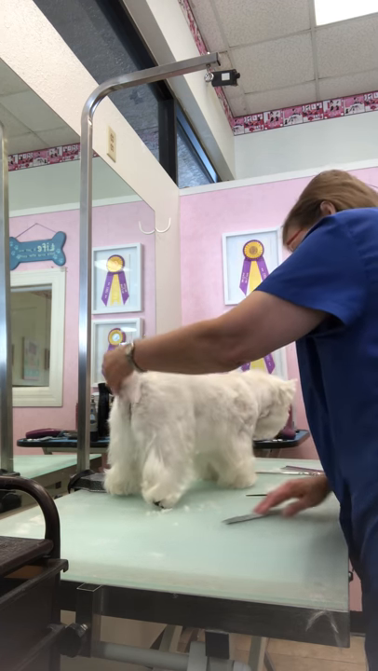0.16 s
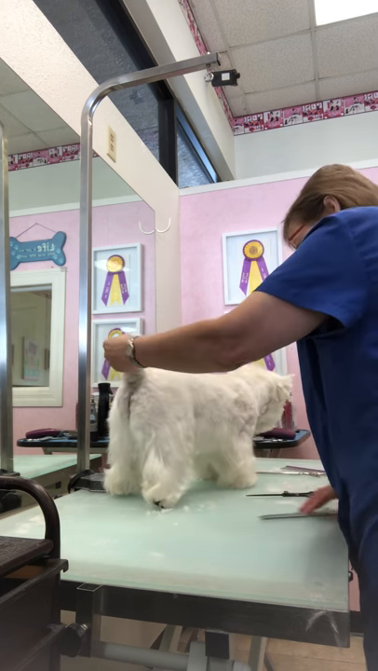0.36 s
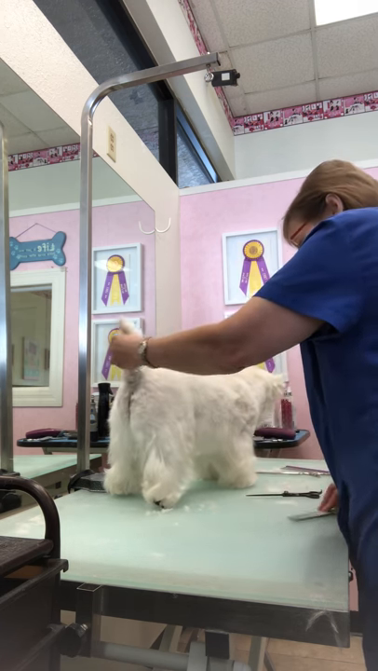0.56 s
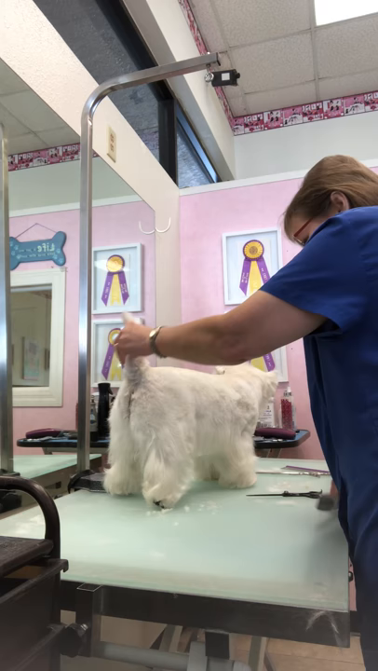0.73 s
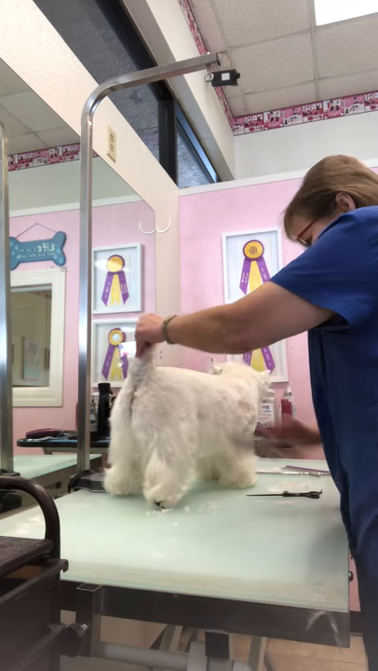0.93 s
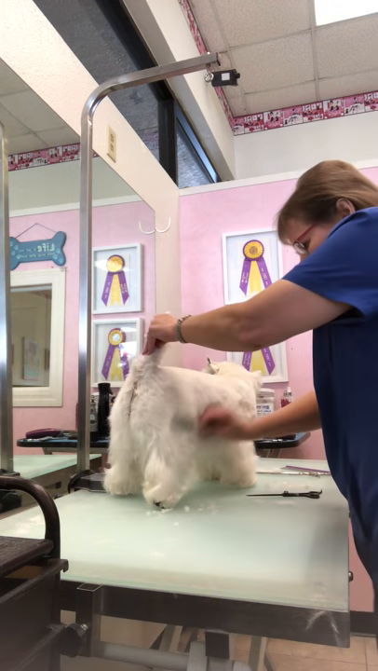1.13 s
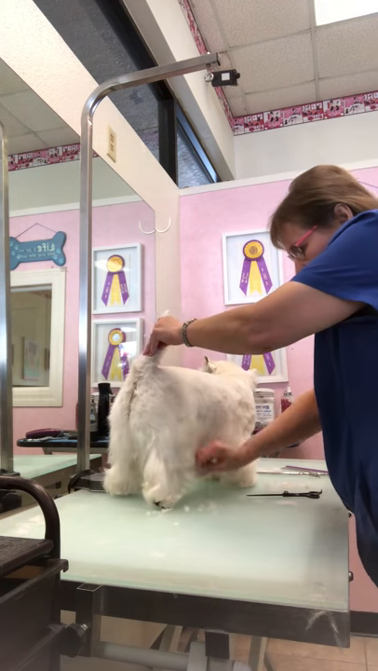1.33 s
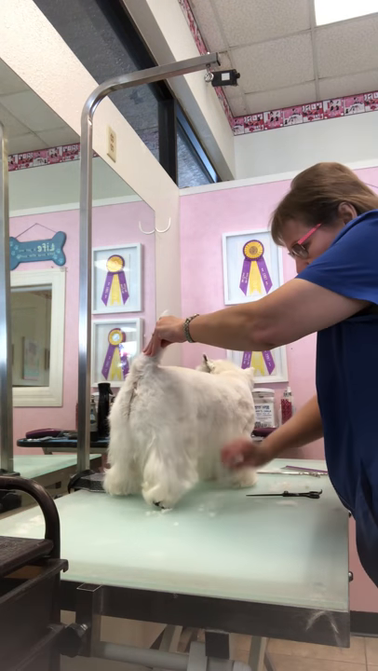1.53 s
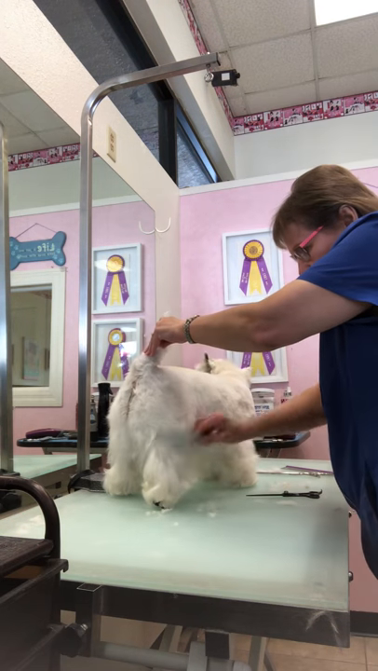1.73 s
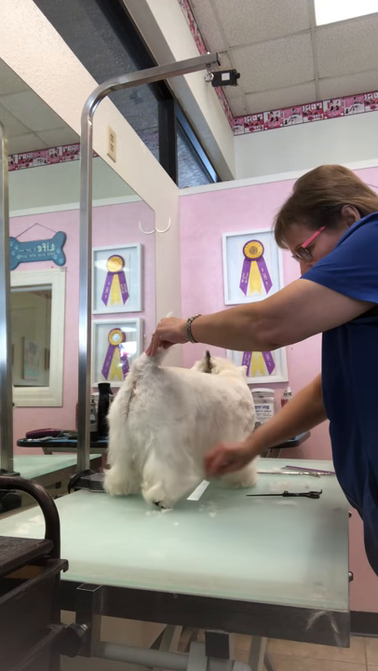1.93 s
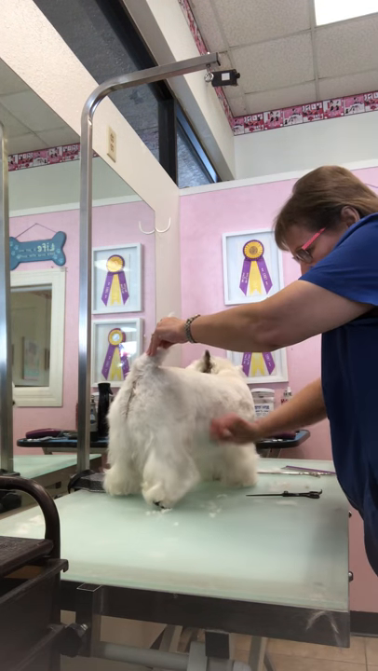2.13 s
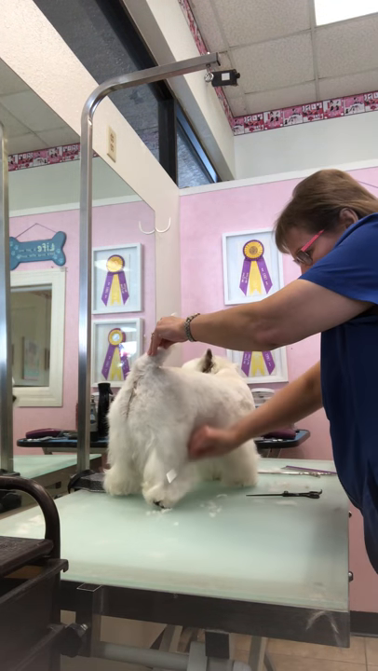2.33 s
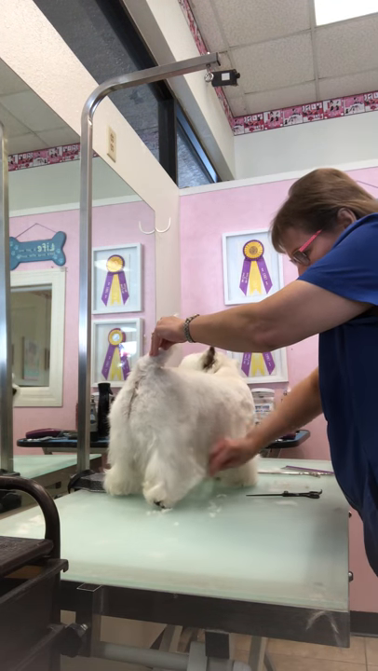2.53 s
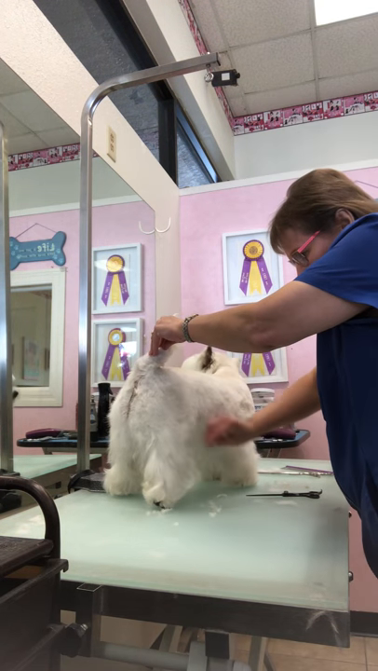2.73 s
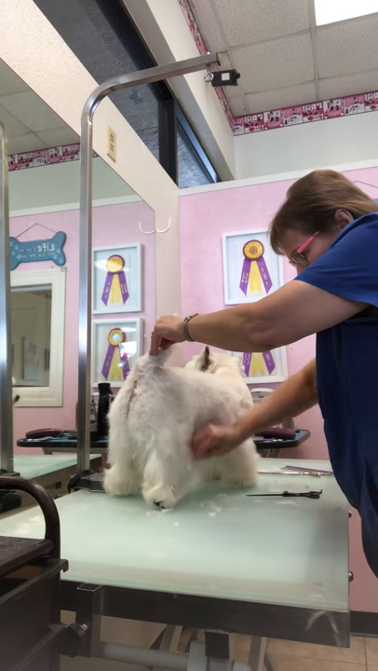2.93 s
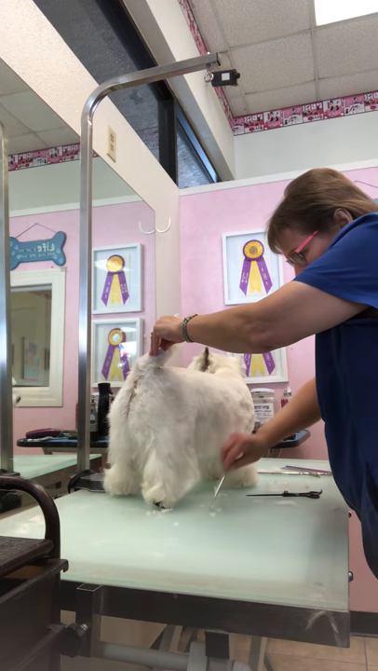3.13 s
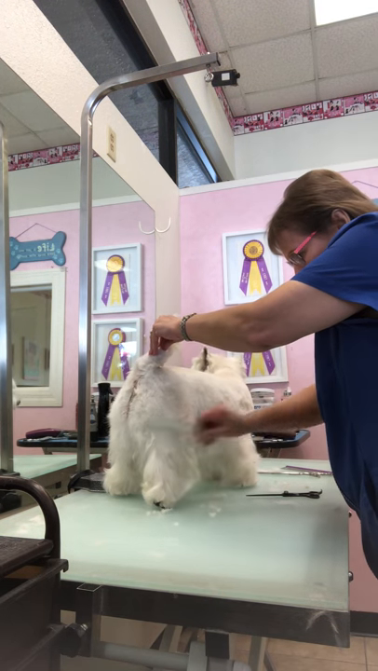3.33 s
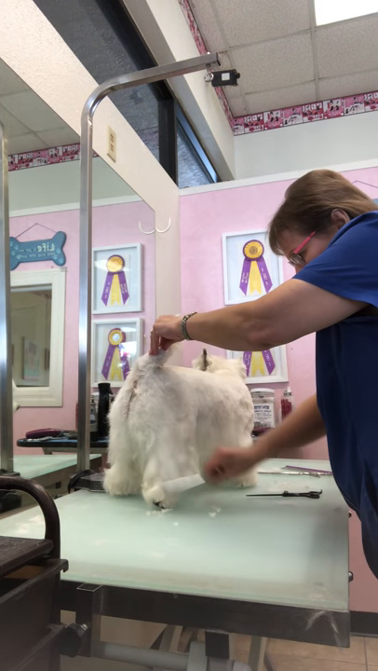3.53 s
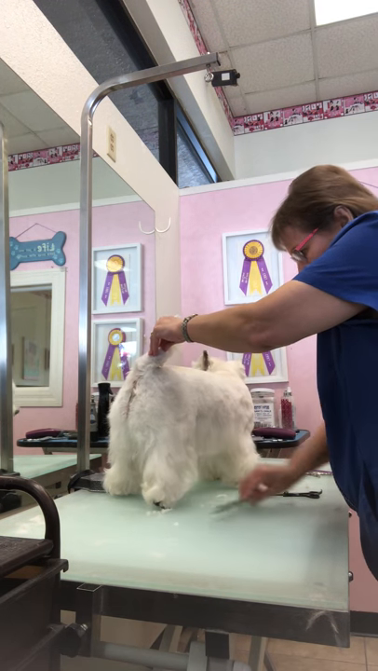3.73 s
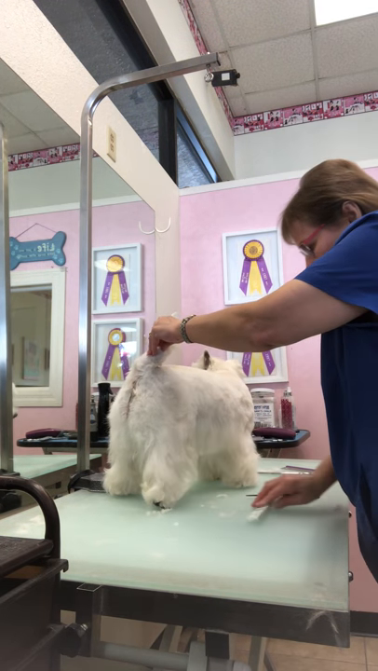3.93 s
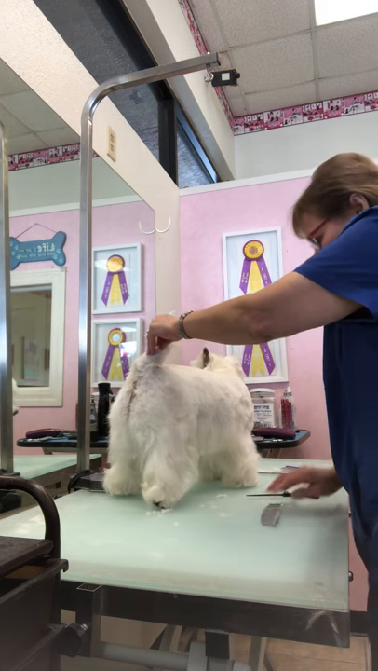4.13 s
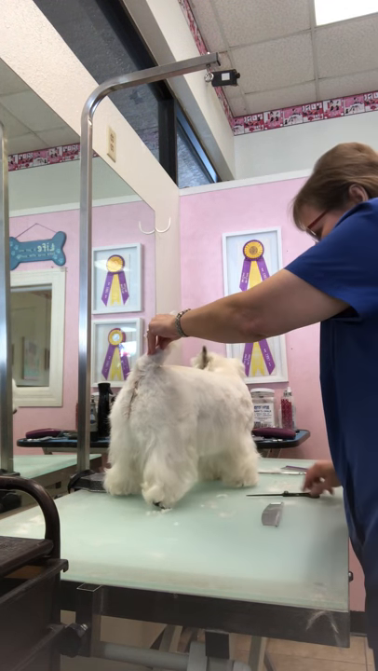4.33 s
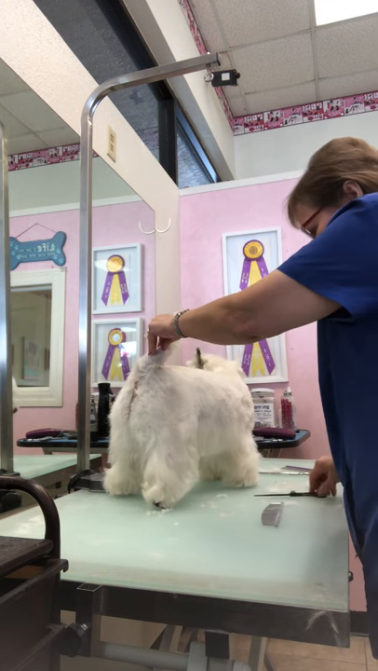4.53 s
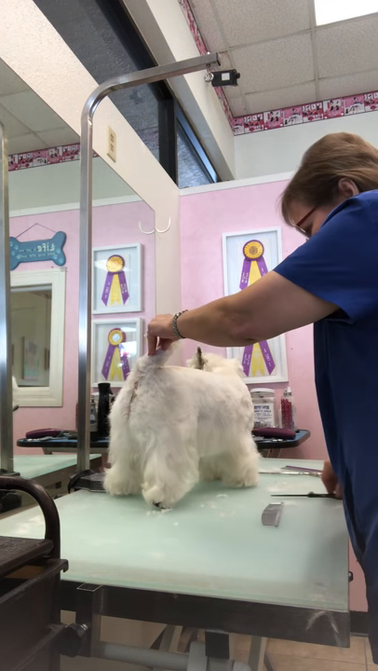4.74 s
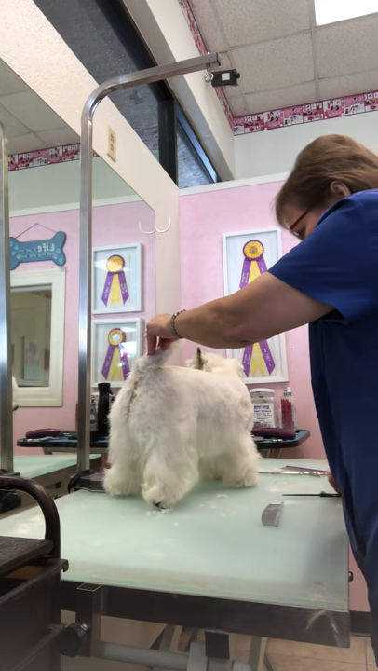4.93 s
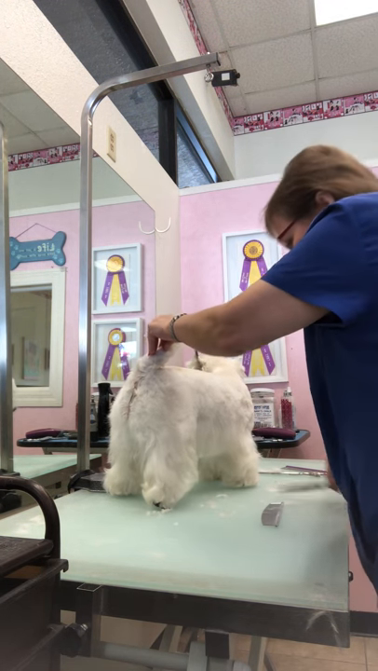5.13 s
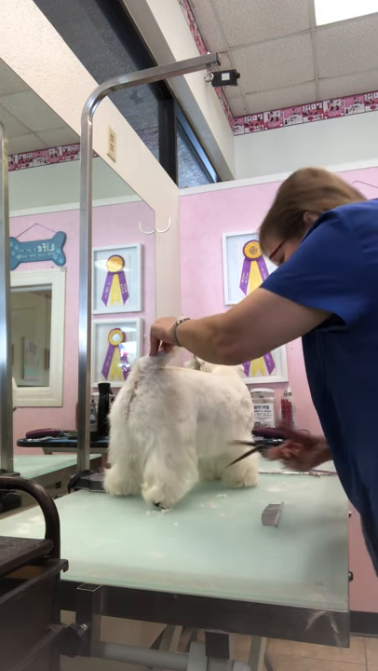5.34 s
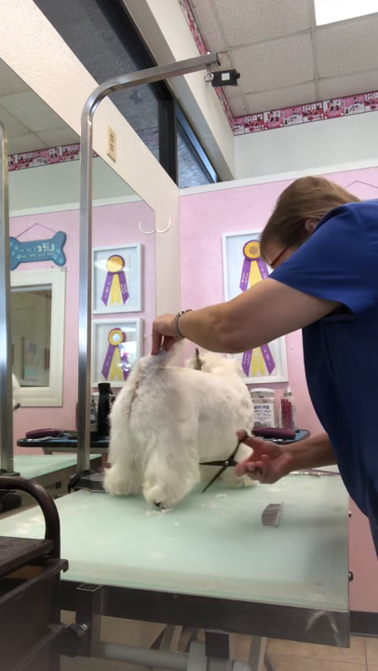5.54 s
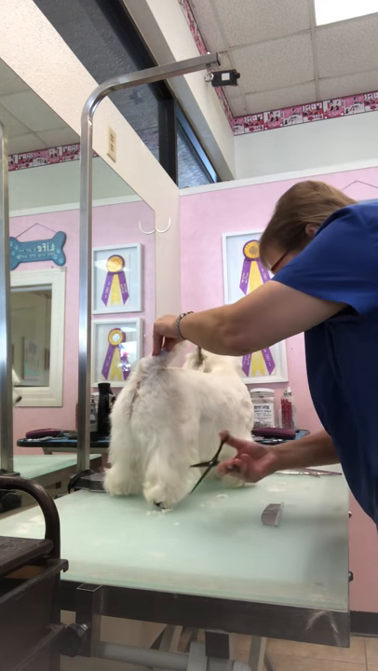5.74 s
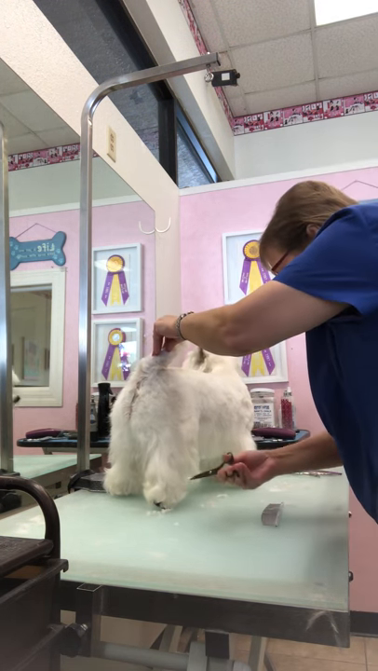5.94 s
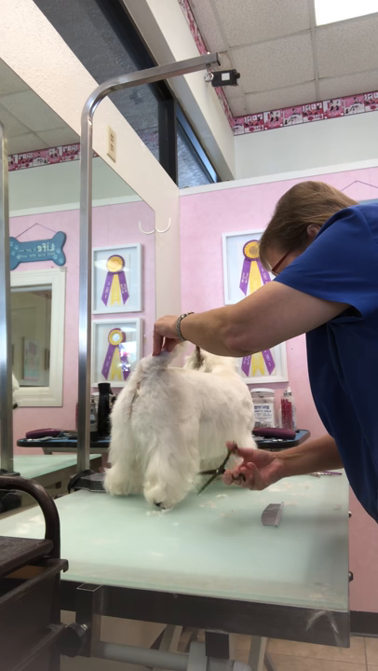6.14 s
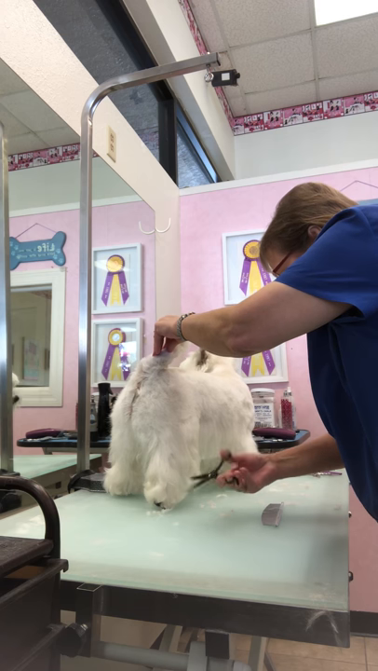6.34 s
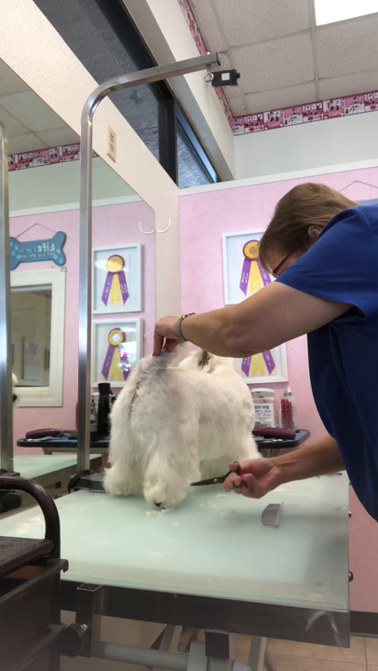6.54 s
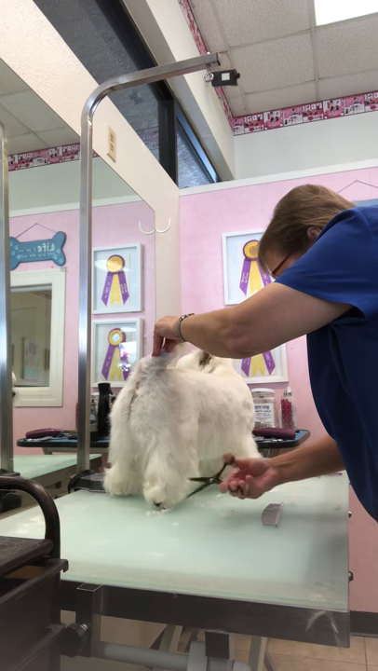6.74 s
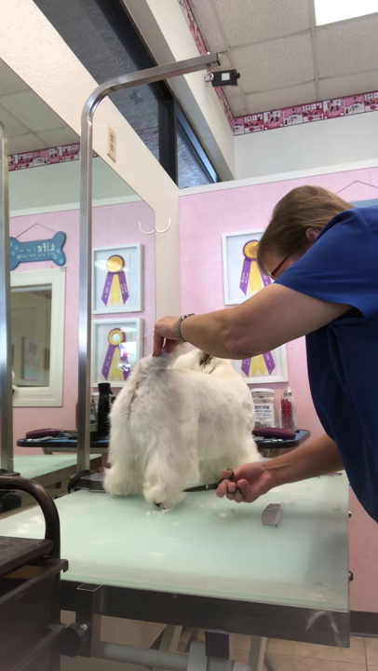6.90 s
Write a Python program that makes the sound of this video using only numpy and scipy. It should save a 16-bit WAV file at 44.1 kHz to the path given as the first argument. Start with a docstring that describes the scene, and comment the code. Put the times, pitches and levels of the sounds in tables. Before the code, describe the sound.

Ventilation fans hum low and pulse slowly throughout, in a small, slightly reverberant grooming salon. In the first second a steel comb slides off the tabletop with a soft, chattering scrape. From about 1.5 to 3.1 seconds it is pulled four times through a dog's coat, each stroke a short, scratchy swish with a faint metallic ring, with soft hand brushes between. A dull shuffle follows at 3.4 seconds. At 3.7 the comb lands and scrapes along the table with a small squeak, then drops at 4 seconds with a sharp clack, the loudest sound. From 4.4 to 5.2 seconds shears are dragged over the table and picked up with a few light knocks. They spring open with a tick at 5.3, then snip three times, at about 6, 6.5 and 6.9 seconds, each a faint crunch of hair ending in a crisp click.

```python
"""A dog is groomed on a table in a small salon, where two ventilation fans hum and slowly beat throughout.
First a steel comb slides off the table top, its teeth chattering by friction. It is pulled four times
through the coat, whose hairs pluck the teeth, then lands on the table, scrapes along it and drops with
a clack. Next, shears are dragged over the table in stick-slip motion and picked up. Last, they spring
open and snip three times: the blades squeak, crunch through hair and click shut."""
import sys
import numpy as np
from scipy import signal
from scipy.fft import rfft, irfft
from scipy.io import wavfile
from scipy.ndimage import map_coordinates

SR = 44100
rng = np.random.default_rng(int(sys.argv[2]) if len(sys.argv) > 2 else 0)


def inscribe(sig):
    """Save sig as 16-bit PCM at rate SR to the path in sys.argv[1].

    A 1-D sig is mono; a 2-D sig holds one channel per row.
    Samples are clipped to [-1, 1] before scaling.
    """
    pcm = np.round(np.clip(np.atleast_2d(sig).T, -1, 1) * 32767)
    wavfile.write(sys.argv[1], SR, pcm.astype(np.int16))


N = 311787
TIME = np.arange(N) / SR

# Comb strokes, four on the coat and the last on the table: (time [s], rise [s], fall [s], level [dB],
# relative hiss [dB], tick [dB], thud [dB], pitch of the struck teeth [Hz], relative singing [dB])
COMB_STROKES = [(1.4946, .004, 0.042, -60, -4, -20.5, -7, 2700, -13),
                (1.985, 0.043, 0.026, -47, -2, -29, -13, 5880, -5),
                (2.5995, 0.023, 0.078, -51, -5.5, -27.5, -21.5, 6250, -11),
                (3.0786, 0.064, 0.054, -53, -4.5, -29, -15, 6400, -1),
                (3.652, 0.07, 0.18, -47, 3, -13, -2.5, 5550, -28)]
# Comb pushes over the table: (time [s], rise [s], fall [s], level [dB], relative treble [dB])
COMB_PUSHES = [(.007, .008, 0.13, -52.5, -9.5), (0.11, 0.13, 0.45, -47, -3), (.675, 0.033, 0.091, -61, 2),
               (.76, 0.012, 0.021, -48.5, -1)]
# Resonances of the steel comb: (frequency [Hz], bandwidth [Hz], relative level [dB])
COMB_RESONANCES = [(1836, 77, -0.5), (2360, 82, 15.5), (2580, 52, -6.5), (2760, 40, 10.5), (3518, 90, 12.5),
                   (3755, 60, 4.5), (4870, 55, -12.5), (6300, 190, -12.5), (6920, 66, -11),
                   (10900, 70, 10.5), (12400, 300, -3), (14100, 140, -4.5)]
# Shears springing open: (time [s], level [dB], squeak pitch [Hz], blade ring [dB])
SHEAR_OPENINGS = [(5.344, -53, 11840, -51), (6.198, -60, 10500, -66), (6.666, -58.5, 10800, -78)]
# Shears closing: (time of click [s], click [dB], blade ring [dB], bite [dB], lead of the bite [s])
SHEAR_SNIPS = [(6.0445, -32, -63, -61, 0.036), (6.5105, -26.5, -70, -62.5, 0.034),
               (6.9432, -27, -67, -62.5, .025)]
# Tools striking the table: (time [s], strike drive [dB], rattle [dB], thud [dB])
TOOL_KNOCKS = [(4.046, 1.5, 5, -9.5), (4.4605, -33, -35, -28.5), (4.751, -27, -33, -17.5),
               (4.833, -40, -38, -44), (5.0395, -20.5, -24, -20.5), (5.1115, -15.5, -13.5, -16.5),
               (6.5112, -47, -33.5, -31)]
# Shears dragged over the table: (time [s], rise [s], fall [s], level [dB], relative edge hiss [dB])
SHEAR_DRAGS = [(4.415, 0.016, 0.044, -52, -17), (4.457, .003, 0.056, -44.5, -20),
               (4.672, 0.019, 0.2, -49, -9.5), (4.91, .02, .11, -55.5, 0.5),
               (4.975, .065, 0.15, -48.5, -21)]
# Steel tips skidding: (time [s], duration [s], first pitch [Hz], last pitch [Hz], level [dB])
TIP_SKIDS = [(0.662, .15, 3410, 3320, -58.5), (3.738, 0.069, 1762, 2290, -45.5),
             (3.794, .14, 3520, 3934, -55), (5.113, .2, 2160, 2054, -62)]
# The hand brushing the coat: (time [s], level [dB])
HAND_BRUSHES = [(1.86, -67.5), (2.12, -64.5), (2.405, -65.5), (2.965, -61)]
# Dull shuffles on the table: (time [s], rise [s], fall [s], level [dB])
TABLE_SHUFFLES = [(.01, .01, .16, -55), (3.405, .045, .065, -47), (3.52, .02, .05, -55)]
# Normal modes of blades and table: (frequency [Hz], relative level [dB], 60 dB decay time [s])
BLADE_RESONANCES = [(6370, -13, 0.1), (7600, -9, 0.19), (9250, -47, .12), (12300, -4, 0.03),
                    (12500, 2, 0.035), (15500, -22, .05)]
TABLE_RESONANCES = [(242, -6, 0.44), (253.6, -8, 0.46), (465, -9.5, 0.31), (518, -10, 0.34),
                    (688.6, -7, 0.24), (1359, 2.5, .19), (1490, 2, 0.18), (1690, -4.5, .2),
                    (1863, 0.5, 0.17), (2110, 5.5, 0.16), (2231, 1, 0.12), (3000, 0.5, 0.11),
                    (4380, -16.5, .15)]
# Reverberation of the salon: (frequency [Hz], 60 dB decay time [s])
SALON_T60 = [(150, 0.31), (500, 0.87), (1500, 0.49), (4000, 0.55), (8000, 0.27), (15000, 0.31)]
# Overtones of the fan motor: (frequency [Hz], level [dB])
MOTOR_OVERTONES = [(92.3, -59.5), (115.95, -53.5), (173.7, -59), (231.8, -62), (290, -64.5), (465.5, -70)]

# Spectral envelopes: (frequency [Hz], relative spectral density [dB])
TEETH_SPECTRUM = [(400, -7), (1200, -8.5), (2100, -8), (2800, 0.5), (3300, -4), (4200, -1), (5200, -3),
                  (6400, -13.5), (7400, -4.5), (8400, -22), (11000, -16.5), (16000, -12.5)]  # plucked teeth
HISS_SPECTRUM = [(2000, 20), (5000, -2), (8000, 0.5), (9000, 10.5), (11000, 6.5), (13000, 0.5), (14400, -5),
                 (16000, -8)]  # teeth running through hair or over the table
SLIDE_SPECTRUM = [(400, 4), (550, 1), (1000, -5.5), (1600, -0.5), (2300, -2.5), (3000, 1.5), (3250, -6),
                  (3700, -0.5), (4300, -10), (8400, -9.5), (12200, -8.5), (16000, -13)]  # comb scraping the table
THUD_SPECTRUM = [(70, -30), (125, 6.5), (155, 3), (190, -12), (250, 4), (320, -9), (410, -5.5), (510, -10),
                 (620, -15.5), (1000, -15), (2000, -36), (5000, -60.5)]  # dull thuds and rubs
BLADE_SPECTRUM = [(2000, -36), (5600, 6), (7500, -2.5), (8600, -23), (10800, -13), (12400, 5), (13600, -1),
                  (14600, -12), (16000, 3)]  # blade sliding on blade
CUT_SPECTRUM = [(700, -29), (1450, -8), (2100, -37), (3100, 12.5), (4100, 7), (5500, 13.5), (7000, -9.5),
                (8300, -6), (10800, 11.5), (12000, -3), (15500, -19)]  # hair between the blades
CLICK_SPECTRUM = [(500, -18), (1400, 8), (3000, -14), (6000, -13), (8200, -3), (10500, 8), (12000, -14),
                  (13600, 15), (14600, 7), (15600, 5)]  # blades meeting their stop
RATTLE_SPECTRUM = [(200, -6), (330, -5.5), (480, 0.5), (750, -5), (1100, 1.5), (1450, -4.5), (2100, -1),
                   (2650, -2.5), (3100, -3.5), (3800, -6), (4600, -8.5), (6000, -11), (8600, -16.5),
                   (9400, -23.5), (10300, -16), (15500, -28)]  # steel settling on the table
DRAG_SPECTRUM = [(300, -12), (650, -7), (950, 8.5), (1400, 5), (1750, 3.5), (2080, -1.5), (2700, -8.5),
                 (4500, -22), (8000, -44.5)]  # rubbed table top
EDGE_SPECTRUM = [(1500, 5), (2800, -2.5), (4200, -2.5), (5400, -11), (7000, -15), (9000, -24), (16000, -37)]  # hiss of a dragged edge
RUMBLE_SPECTRUM = [(15, -6), (40, 9.5), (60, -15), (75, -12), (92, 14), (115, 9.5), (150, 25), (200, 6.5),
                   (280, -23)]  # duct rumble
AIR_SPECTRUM = [(120, -27.5), (200, -4), (240, -2.5), (300, -4), (465, -7.5), (683, -16.5), (1060, -22.5),
                (2500, -30), (7500, -37.5), (8600, -44.5), (16000, -78)]  # rushing air


def comb_strokes(bite=0.5, ping_db=-2, cushion_hz=500):
    """Plucked vibration: the comb lands on coat or table, then its teeth catch, sing and hiss."""
    teeth_envelope, hiss_envelope = gestures(COMB_STROKES, bite)
    times, tick_db, thud_db = np.transpose(COMB_STROKES)[[0, 5, 6]]
    plucks = teeth_envelope * friction(per_s=1200, spread_db=-0.5)
    plucks += impacts(times, tick_db, t60=0.037)
    steel = from_db(-2.5) * coloured(plucks, TEETH_SPECTRUM) + from_db(-22) * comb_ring(plucks)
    for start, rise, fall, db, _, landing_db, _, hz, sing_db in COMB_STROKES:
        ping = clicks([start], landing_db + ping_db)
        singing = gesture(start, rise / 2, fall, db + sing_db, bite) * rng.standard_normal(N)
        steel += struck_teeth(ping + singing, hz)
    slips = hiss_envelope * friction(per_s=6800, spread_db=-2)
    hiss = from_db(-7.5) * coloured(slips, HISS_SPECTRUM) + from_db(-8.5) * teeth_ring(slips)
    thud = coloured(impacts(times + 0.003146, thud_db, t60=0.073), THUD_SPECTRUM)
    # Each landing gives the table a soft push; on the coat, the dog's body is the cushion.
    push = butterworth(clicks(times + 0.00494, thud_db), cushion_hz, "low")
    return steel + hiss + from_db(-1) * thud + from_db(-36) * ring(push, TABLE_RESONANCES)


def comb_slide(crossover_hz=4500, treble_exponent=1.23):
    """Sliding friction: the teeth chatter over the table, brighter with speed, and the comb resonates."""
    bass, treble = 0, 0
    for start, rise, fall, db, treble_db in COMB_PUSHES:
        speed = gesture(start, rise, fall, 0, bite=0.34)
        bass += from_db(db) * speed
        treble += from_db(db + treble_db) * speed ** treble_exponent
    slips = friction(per_s=12000, spread_db=1.2)
    chatter = bass * butterworth(slips, crossover_hz, "low", order=3)
    chatter += treble * butterworth(slips, crossover_hz, "high", order=3)
    scrape = from_db(-2.5) * coloured(chatter, SLIDE_SPECTRUM) + from_db(-9) * comb_ring(chatter)
    scrape += from_db(-9.5) * butterworth(teeth_ring(chatter), [10000, 14800])  # the tips shimmer
    # A reflection off the table interferes, over a path that changes as the comb moves.
    delay_s = 0.0012 + 0.00023 * drift(per_s=5)
    reflection = map_coordinates(scrape, [(TIME - delay_s) * SR], order=3)
    return scrape + from_db(-11.5) * reflection


def comb_ring(drive):
    """Modal superposition: the comb's damped resonances respond in parallel."""
    t = TIME[:SR // 4]
    response = 0
    for k, (hz, width, db) in enumerate(COMB_RESONANCES):
        decay = from_db(db) * np.sqrt(width) * np.exp(-np.pi * width * t)
        response += (-1) ** k * decay * np.cos(2 * np.pi * hz * t)
    return convolve(drive, unit_energy(response))


def teeth_ring(drive, width_hz=70, count=26):
    """Free vibration: each tooth rings briefly at its own natural frequency in the treble."""
    t = TIME[:SR // 10]
    pitches = np.linspace(4500, 15500, count) + rng.uniform(-180, 180, count)
    tones = np.sin(2 * np.pi * np.outer(pitches, t)).sum(0)
    return convolve(drive, unit_energy(np.exp(-np.pi * width_hz * t) * tones))


def struck_teeth(drive, hz, width_hz=540):
    """Modal overlap: many teeth of nearly equal pitch ring as one narrow band."""
    response = butterworth(burst(t60=0.048), [hz - width_hz / 2, hz + width_hz / 2])
    return convolve(drive, unit_energy(response))


def shears(open_rise_s=0.007, shut_rise_s=0.008):
    """Friction and impact: blades open with a tick and a zip, then squeak, cut hair and click shut."""
    slides, contacts, squeaks = [], [], 0
    for start, db, hz, ring_db in SHEAR_OPENINGS:
        slides.append((start, open_rise_s, 0.03, db, -8.5))
        contacts.append((start + open_rise_s / 2, db + 22.5, ring_db))
        squeaks += blade_squeak(start, length=0.011, hz=hz, db=db - 1)
    for shut, click_db, ring_db, bite_db, lead in SHEAR_SNIPS:
        bite_time = shut - lead
        slides.append((bite_time, 0.0084, 0.013, bite_db, -2))  # the blades first meet the hair
        slides.append((shut - shut_rise_s, shut_rise_s, 0.0087, -55.5, -2))  # the tips cut the last
        contacts.append((shut, click_db, ring_db))
        squeaks += blade_squeak(bite_time - 0.022, length=0.042, hz=11270, db=bite_db - 7)
        squeaks += blade_squeak(bite_time, length=0.021, hz=2580, db=bite_db - 4.5)  # the hair rasps
    steel_envelope, hair_envelope = gestures(slides, bite=0.3)
    slips = friction(per_s=3500, spread_db=1.5)
    sliding = coloured(steel_envelope * slips, BLADE_SPECTRUM)
    crunch = coloured(hair_envelope * slips, CUT_SPECTRUM)
    times, click_db, ring_db = np.transpose(contacts)
    ticks = coloured(impacts(times, click_db, t60=0.011), CLICK_SPECTRUM)
    return sliding + crunch + squeaks + ticks + ring(clicks(times, ring_db), BLADE_RESONANCES)


def blade_squeak(start, length, hz, db, glide=1.1, blade_ratio=1.1, width_hz=320):
    """Friction-driven resonance: both blades squeak, rising in pitch as their crossing point travels."""
    upper_hz = hz * blade_ratio
    lower = squeak(start, length, hz, hz * glide, width_hz, db)
    return lower + squeak(start, length, upper_hz, upper_hz * glide, width_hz, db - 3.5)


def knocks():
    """Impact excitation: the steel rattles as it settles, and the table thuds and rings."""
    times, strike_db, rattle_db, thud_db = np.transpose(TOOL_KNOCKS)
    rattle = coloured(impacts(times + 0.001, rattle_db, t60=0.099), RATTLE_SPECTRUM)
    thud = coloured(impacts(times + 0.00625, thud_db, t60=0.25), THUD_SPECTRUM)
    return rattle + thud + from_db(-46.5) * ring(clicks(times, strike_db), TABLE_RESONANCES)


def clacks(band_hz=(1350, 2400)):
    """Transient response: the table top radiates a few cycles after each hard strike."""
    times, strike_db = np.transpose(TOOL_KNOCKS)[:2]
    return from_db(16.5) * butterworth(clicks(times + 0.0003, strike_db), band_hz, order=3)


def drags():
    """Stick-slip excitation: the dragged shears drive the table's modes while their edge hisses."""
    top_envelope, edge_envelope = gestures(SHEAR_DRAGS, bite=0.67)
    slips = friction(per_s=3200, spread_db=1.7)
    judder = from_db(0.5 * drift(per_s=53))  # the steel catches and lets go
    slips = unit_rms(slips * judder)
    top = coloured(top_envelope * slips, DRAG_SPECTRUM)
    hiss = coloured(edge_envelope * slips, EDGE_SPECTRUM)
    return from_db(1) * top + from_db(-55) * ring(top, TABLE_RESONANCES) + hiss


def skids(width_hz=200, third_db=-14):
    """Stick-slip oscillation: steel tips squeak on the table, with a faint third harmonic."""
    out = 0
    for start, length, from_hz, to_hz, db in TIP_SKIDS:
        out += squeak(start, length, from_hz, to_hz, width_hz, db)
        out += squeak(start, length, 3 * from_hz, 3 * to_hz, width_hz, db + third_db)
    return out


def squeak(start, length, from_hz, to_hz, width_hz, db):
    """Narrow-band noise: an unsteady stick-slip resonance swells, glides and fades."""
    out, n, onset = np.zeros(N), int(length * SR), int(start * SR)
    waver = butterworth(rng.standard_normal((2, SR // 2)), width_hz, "low")[:, -n:]
    phase = 2 * np.pi * np.cumsum(np.linspace(from_hz, to_hz, n)) / SR
    tone = unit_rms(waver[0] * np.cos(phase) + waver[1] * np.sin(phase))
    swell = from_db(db) * np.sin(np.linspace(0, np.pi, n))
    out[onset:onset + n] = (swell * tone)[:N - onset]
    return out


def brushes(rise_s=0.036, fall_s=0.036):
    """Friction noise: the hand swishes softly over the coat between strokes."""
    envelope = sum(gesture(start, rise_s, fall_s, db) for start, db in HAND_BRUSHES)
    rub = envelope * rng.standard_normal(N)
    return coloured(rub, DRAG_SPECTRUM) + from_db(-7) * coloured(rub, EDGE_SPECTRUM)


def shuffles(boom_hz=(145, 185)):
    """Forced vibration: a soft rub sets the table booming."""
    boom = unit_rms(butterworth(rng.standard_normal(N), boom_hz))
    rub = from_db(-7) * coloured(rng.standard_normal(N), THUD_SPECTRUM)
    return sum(gesture(*row) for row in TABLE_SHUFFLES) * (boom + rub)


def salon(sound, early_db=-5.5, tail_db=-8, build_s=0.012, echoes=40):
    """Reverberation: echoes off table, mirror and walls, then a diffuse tail, longest near 500 Hz."""
    t = TIME[:SR]
    edges_hz = np.geomspace(60, 20000, 10)
    tail = 0
    for low, high in zip(edges_hz, edges_hz[1:]):
        t60 = at_hz(SALON_T60, np.sqrt(low * high))
        tail += butterworth(rng.standard_normal(SR), [low, high]) * from_db(-60 * t / t60)
    tail *= 1 - np.exp(-t / build_s)
    early = np.zeros(SR)
    early[(rng.uniform(0.001, 0.02, echoes) * SR).astype(int)] = rng.standard_normal(echoes)
    return convolve(sound, from_db(early_db) * unit_energy(early) + from_db(tail_db) * unit_energy(tail))


def ventilation(fan_hz=57.78, beat_s=2.25, antiphase_s=2.3):
    """Beats: two fans of nearly equal speed interfere, over motor hum, duct rumble and rushing air."""
    radians_per_hz = 2 * np.pi * (TIME - antiphase_s)
    loud_fan = from_db(-52) * np.sin(fan_hz * radians_per_hz + 0.15 * drift(per_s=4.7))
    soft_fan = from_db(-58) * np.sin((fan_hz + 1 / beat_s) * radians_per_hz)
    hum = 0
    for hz, db in MOTOR_OVERTONES:
        wavering_gain = from_db(db + 2.5 * drift(per_s=6.3))
        hum += wavering_gain * np.sin(2 * np.pi * hz * TIME + 0.3 * drift(per_s=8.1))
    rumble = from_db(-59) * coloured(rng.standard_normal(N), RUMBLE_SPECTRUM)
    air = from_db(-56.5) * coloured(rng.standard_normal(N), AIR_SPECTRUM)
    return np.sqrt(2) * (loud_fan - soft_fan) + hum + rumble + air


def gesture(start, rise, fall, db, bite=0.22):
    """Amplitude envelope: contact starts at the share `bite` of full speed, swells and fades."""
    t = TIME - start
    swell = bite + (1 - bite) * np.clip(t / rise, 0, 1)
    fade = np.exp(-2 * np.clip((t - rise) / fall, 0, 10) ** 2)
    return from_db(db) * (t > 0) * swell * fade


def gestures(rows, bite):
    """Superposed envelopes, main and hiss: (time [s], rise [s], fall [s], level [dB], hiss [dB])."""
    shapes = [gesture(*row[:4], bite) for row in rows]
    return sum(shapes), sum(shape * from_db(row[4]) for shape, row in zip(shapes, rows))


def friction(per_s, spread_db):
    """Shot noise: random micro-slips of uneven size, at unit rms."""
    sizes = from_db(spread_db * np.minimum(rng.exponential(1, N), 4)) * rng.standard_normal(N)
    return unit_rms(sizes * (rng.random(N) < per_s / SR))


def clicks(times, db):
    """Impulse excitation: one sample per contact."""
    out = np.zeros(N)
    out[np.round(np.asarray(times) * SR).astype(int)] = from_db(db)
    return out


def burst(t60):
    """Exponential decay: a dying cloud of tiny contacts, of unit energy."""
    t = TIME[:SR // 2]
    return unit_energy(rng.standard_normal(len(t)) * from_db(-60 * t / t60))


def impacts(times, db, t60):
    """Multiple contact: each impulse spreads into a short noise burst."""
    return convolve(clicks(times, db), burst(t60))


def ring(drive, modes):
    """Normal modes: each impulse sets off a sum of damped sines."""
    t = TIME[:SR]
    response = sum((-1) ** k * from_db(db - 60 * t / t60) * np.sin(2 * np.pi * hz * t)
                   for k, (hz, db, t60) in enumerate(modes))
    return convolve(drive, response)


def coloured(x, spectrum, size=4096):
    """Minimum-phase filtering at unit energy, falling away below the spectrum's lowest point."""
    hz = np.maximum(np.fft.rfftfreq(size, 1 / SR), 1)
    gain = from_db(at_hz(spectrum, hz)) * np.minimum(hz / spectrum[0][0], 1) ** 2
    cepstrum = irfft(np.log(gain + 1e-6))
    cepstrum[1:size // 2] *= 2  # folding onto positive time makes the response causal
    cepstrum[size // 2 + 1:] = 0
    return convolve(x, unit_energy(irfft(np.exp(rfft(cepstrum)))))


def butterworth(x, hz, kind="band", order=2):
    """Maximally flat filtering: band-, low- or high-pass."""
    return signal.sosfilt(signal.butter(order, hz, kind, fs=SR, output="sos"), x)


def convolve(x, response):
    """Convolution: a sound passes through an impulse response."""
    return signal.oaconvolve(x, response)[:N]


def drift(per_s):
    """Random modulation: a smooth curve with a spread near 1."""
    knots = rng.standard_normal(4096)
    coarse = TIME[::32]
    return np.interp(TIME, coarse, map_coordinates(knots, [coarse * per_s], order=3, mode="wrap"))


def at_hz(points, hz):
    """Interpolation of a table on a log-frequency axis."""
    frequencies, values = np.transpose(points)
    return np.interp(np.log(np.maximum(hz, 1)), np.log(frequencies), values)


def from_db(db):
    """Amplitude ratio of a level in decibels."""
    return 10 ** (np.asarray(db) / 20)


def unit_rms(x):
    """Normalisation to a mean square of 1."""
    return x / np.sqrt(np.mean(x ** 2) + 1e-20)


def unit_energy(x):
    """Normalisation to a sum of squares of 1."""
    return x / np.linalg.norm(x)


def scene():
    """Superposition of direct sound, reverberation and fans; clacks and snips excite the room less."""
    handling = comb_slide() + skids() + comb_strokes() + brushes() + shuffles() + drags() + knocks()
    clacking, snipping = clacks(), shears()
    echo = salon(handling + from_db(-4) * clacking + from_db(-5.5) * snipping)
    return (handling + clacking + snipping + echo + ventilation())[None]


def record(dry, cutoff_hz=15900):
    """Band limiting: a steep low-pass removes the highest treble."""
    return signal.sosfilt(signal.ellip(10, 0.2, 70, cutoff_hz, fs=SR, output="sos"), dry)


dry = scene()
out = record(dry)
inscribe(out)
```